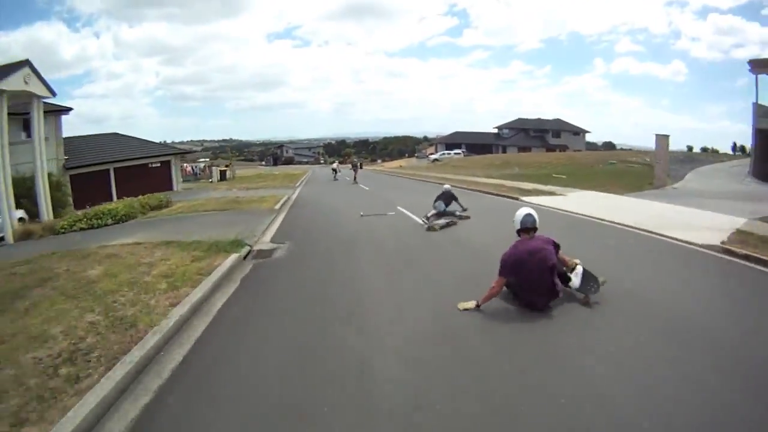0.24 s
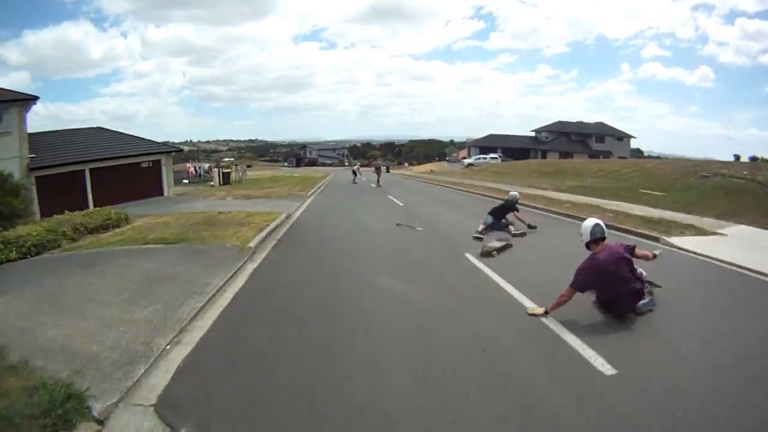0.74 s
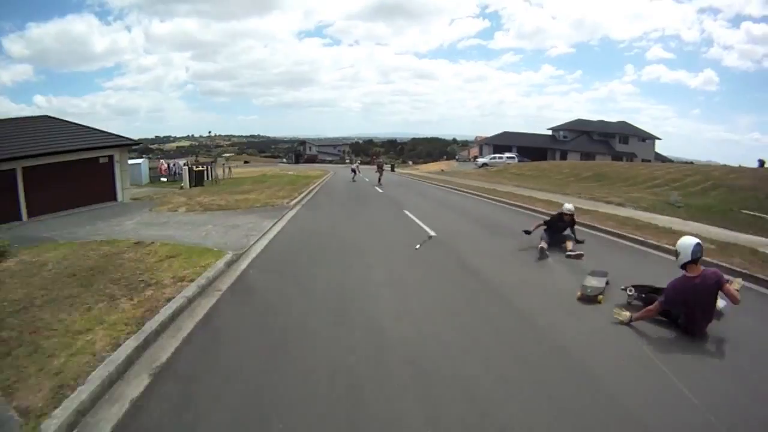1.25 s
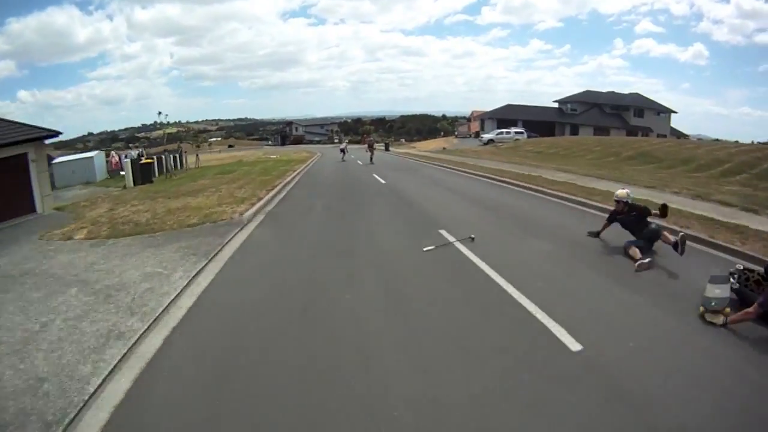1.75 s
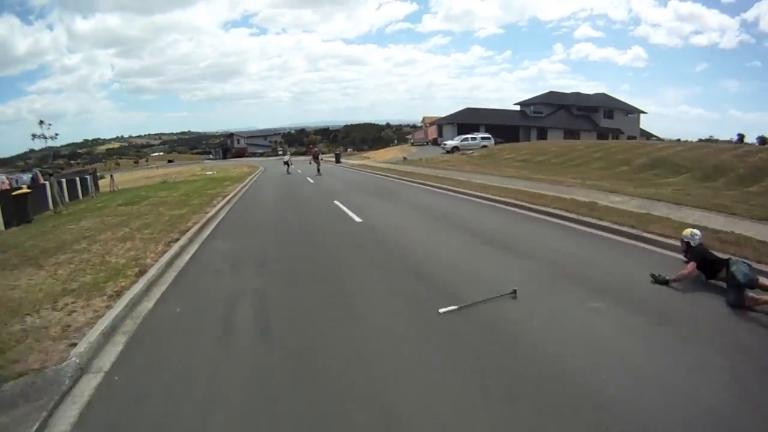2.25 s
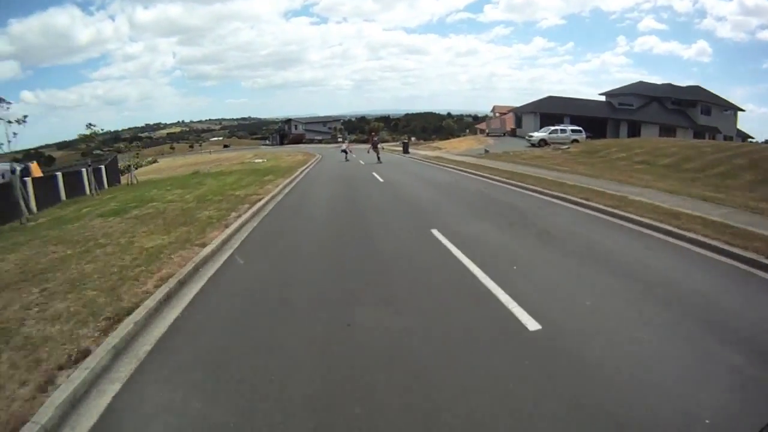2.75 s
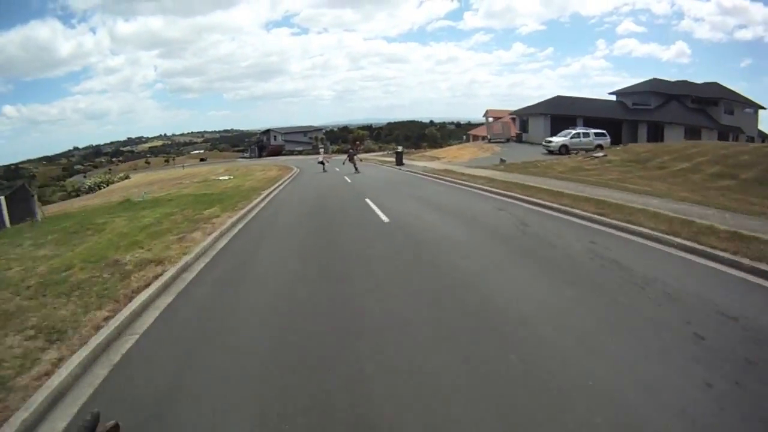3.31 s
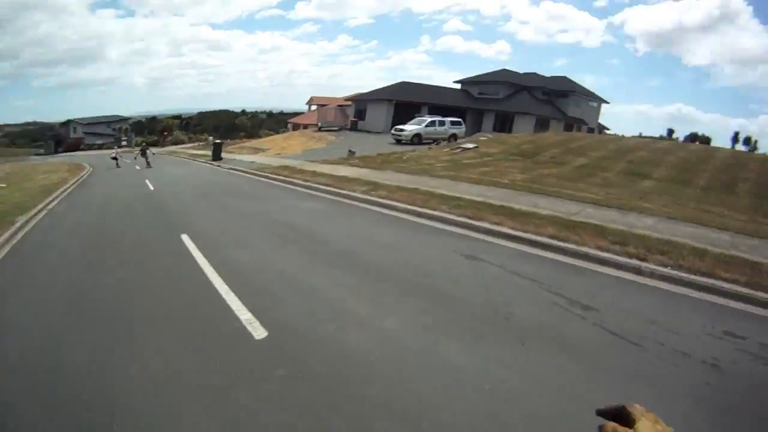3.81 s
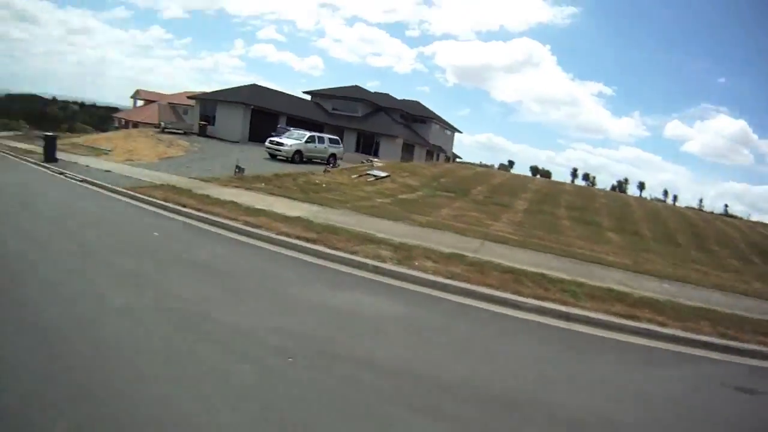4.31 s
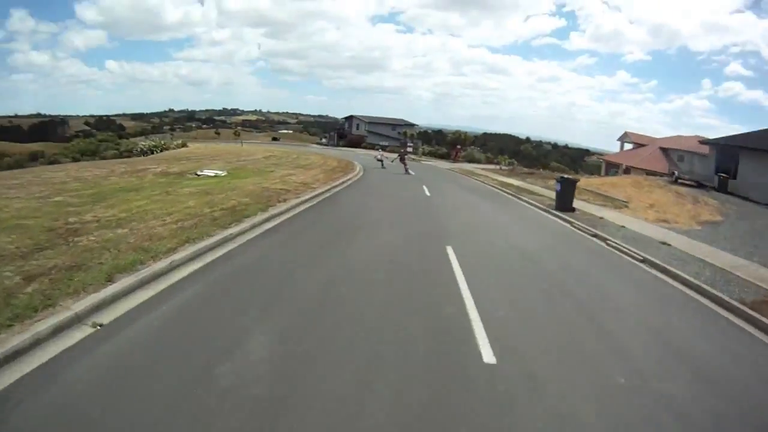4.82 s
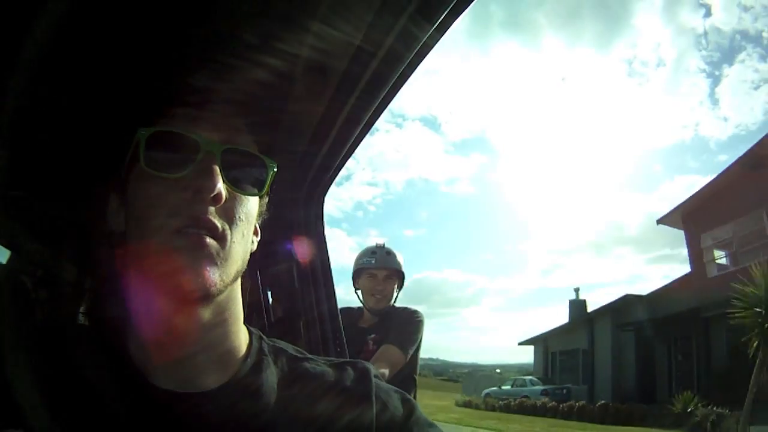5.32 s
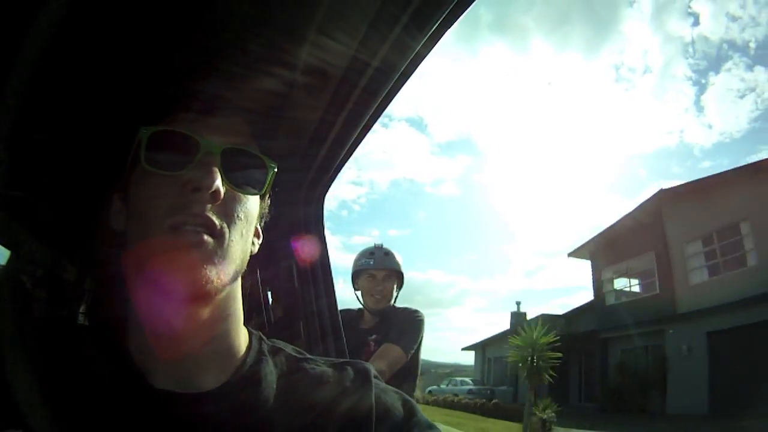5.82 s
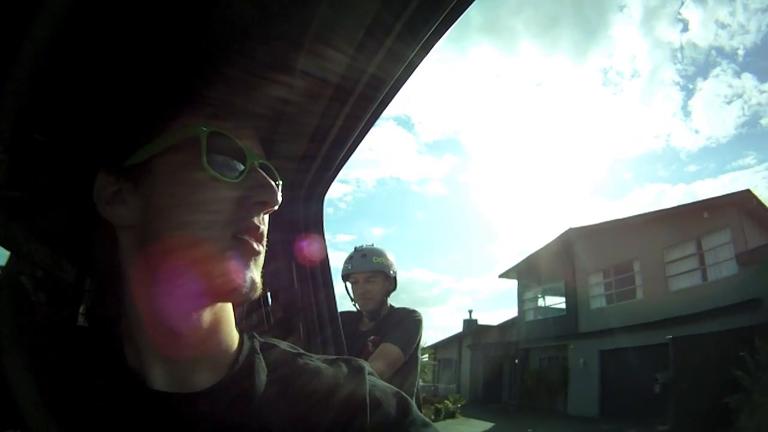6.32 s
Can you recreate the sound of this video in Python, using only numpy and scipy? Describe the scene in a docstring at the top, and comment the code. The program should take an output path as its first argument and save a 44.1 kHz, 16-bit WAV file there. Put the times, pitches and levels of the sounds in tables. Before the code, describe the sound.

Outdoors on an asphalt road, strong wind rumbles and thumps against a moving microphone. Underneath, board wheels roll and scrape in gritty, hollow-ringing slides, and a dropped pole knocks, loudest just after two seconds. At five seconds the sound dips to silence, then a car cabin appears: low steady engine hum, boomy road noise, soft hiss and a cluster of clicks.

```python
"""Longboards roll and slide down an asphalt road: gritty noise rings the decks, over a faint far road.
Wind buffets the microphone with noise and pushes of air; a dropped pole clatters as short ringing modes.
After a short fade through silence we sit in a car cabin with an open window: the engine hums as a stack of
tones, noise booms and hisses with it, and something clicks. Both places are heard at a low sample rate
with every sample repeated, which mirrors the sound around that rate."""
import sys
import numpy as np
from scipy import signal
from scipy.fft import rfft, irfft, next_fast_len
from scipy.io import wavfile
from scipy.ndimage import uniform_filter1d, map_coordinates

SR = 44100
rng = np.random.default_rng(int(sys.argv[2]) if len(sys.argv) > 2 else 0)


def pcm_store(signal):
    """Save signal as 16-bit PCM."""
    levels = np.round(np.clip(np.atleast_2d(signal), -1, 1) * 32767)
    wavfile.write(sys.argv[1], SR, levels.astype(np.int16).T)


N = 289296
T = np.arange(N) / SR  # time in seconds

# Wind at the microphone. Each row: time in seconds, buffet level in dB, flutter level in dB.
WIND_LEVELS = [(0.0, -18, -24), (0.36, -17, -24.5), (0.68, -15, -23), (0.72, -28, -34.5),
               (0.84, -26.5, -27.5), (0.89, -15, -22.5), (1.09, -22.5, -23), (1.33, -13, -20),
               (1.37, -20, -36), (1.44, -16, -28), (1.51, -23, -29.5), (1.62, -16.5, -22.5),
               (2.24, -15.5, -27), (2.41, -24, -24), (2.49, -16.5, -21.5), (2.63, -18.5, -27),
               (2.99, -16.5, -23.5), (3.83, -17.5, -25), (3.93, -30, -32.5), (3.99, -14.5, -24),
               (4.2, -17.5, -14.5), (4.63, -20, -27.5), (4.71, -14, -23), (4.87, -14.5, -24),
               (4.97, -25.5, -36)]
# Colours of the wind, low to high. Each row: frequency in Hz, relative density in dB per Hz.
BUFFET_SPECTRUM = [(7.1, -23), (12, -4.5), (48, 2.5), (160, -8), (210, -39), (350, -120)]
FLUTTER_SPECTRUM = [(59, -24), (100, -3), (137, -6), (177, -3), (268, -2), (384, -16.5), (480, -29),
                    (620, -47.5), (1060, -120)]
SPRAY_SPECTRUM = [(330, -35.5), (420, -3), (800, -8.5), (1100, -13), (1900, -18.5), (2300, -32)]
# Spray above the flutter: level at rest in dB, flutter level where it starts to grow in dB,
# growth in dB per dB of flutter, smoothing in seconds.
SPRAY_GROWTH = (-41.5, -22, 2.2, 0.1)
# The hardest pushes of air. Each row: time in seconds, relative peak in dB, width scale in ms.
HARD_PUSHES = [(0.171, -6, 3.1), (0.336, -4.5, 2.8), (0.472, -4.5, 4.5), (0.527, -7, 4.3),
               (0.655, -5.5, 3.5), (1.274, -11, 2.5), (1.312, -3.5, 2.7), (1.627, -6.5, 2.04),
               (1.668, -5, 6.4), (1.818, -5, 2.6), (2.492, -2, 6), (2.555, -7, 3.7), (2.653, -4.5, 2.9),
               (2.779, -4.5, 4.1), (3.145, -3.5, 3.5), (3.247, -10, 4.3), (3.417, -5, 2.5),
               (4.107, -5.5, 2.2), (4.213, -8, 1.3), (4.245, -12, 1.4), (4.348, -7, 1.6),
               (4.398, -7.5, 2.2), (4.718, -6, 2.7), (4.771, -5, 3.2)]

# Colours of the boards on the road. Each row: frequency in Hz, relative density in dB per Hz.
WHEEL_SPECTRUM = [(470, -24), (800, -8.5), (1200, 0), (1320, -1), (1560, -4.5), (1940, -14), (2050, -15),
                  (2660, -38.5), (4510, -120)]
GRIT_SPECTRUM = [(1150, -59), (1950, -7), (2110, -2), (2360, 4), (2780, -1.5), (2990, -11.5), (3890, -34.5),
                 (6580, -120)]
SQUEAL_SPECTRUM = [(1600, -33.5), (1700, -4.5), (1880, 1), (2000, -29.5)]  # a brighter band of hard slides
FAR_ROAD_SPECTRUM = [(1500, -25), (1900, -3.5), (2700, 4.0), (2990, -4.5)]
# Resonances of the sliding boards. Each row: frequency in Hz, width in Hz, gain in dB.
DECK_MODES = [(1040, 120, -0.5), (1195, 27, -11), (1510, 60, 7)]
# Slides. Each row: peak time, rise and fall in seconds, wheel and grit level in dB,
# centre of the deck ring in Hz.
BOARD_SLIDES = [(0.29, 0.037, 0.087, -36.5, -52, 1510), (0.44, 0.11, 0.2, -37, -51.5, 1190),
                (0.751, 0.054, .08, -42, -53, 1404), (0.96, 0.22, 0.48, -37.5, -50, 1258),
                (1.15, 0.12, 0.11, -31.5, -44, 1315), (1.275, 0.11, 0.063, -26, -39.5, 1450),
                (1.631, 0.29, 0.13, -34, -49.5, 1230), (1.839, 0.2, 0.16, -37, -54, 1174),
                (2.431, .2, 0.13, -31, -44.5, 1346), (2.57, 0.11, .13, -33.5, -54.5, 1226),
                (2.865, 0.019, 0.031, -37.5, -54.5, 1355), (3.149, 0.053, 0.046, -39, -57.5, 1410),
                (3.56, 0.055, 0.14, -42.5, -53.5, 1510), (3.9, 0.12, 0.16, -44, -54, 1260),
                (4.25, 0.32, 0.24, -38, -52, 1100), (4.5, 0.077, 0.18, -36.5, -45.5, 1470),
                (4.69, 0.16, 0.11, -37.5, -39.5, 1426), (4.96, 0.037, 0.079, -42, -49, 1450)]
# Plain rolling between slides, and how far the deck ring wanders there.
ROLL_DB, ROLL_GRIT_DB, ROLL_RING_HZ, RING_WANDER_HZ = -44.5, -57.5, 1260, 70
SLIDE_SHAPE = 1.53  # 1 pointed, higher flat-topped

# Blows of the pole, then clicks in the cabin. Each row: time in seconds, base level of the low modes in dB,
# base level of the high modes in dB, multiplier of the ring times.
POLE_BLOWS = [(0.266, -31, -49, 0.8), (0.735, -34, -39, 0.6), (1.24, -17, -40.5, 0.7),
              (1.261, -18, -39.5, 0.9), (2.255, -33, -69.5, 0.8), (2.309, -8.5, -24.5, 0.6),
              (2.312, -16.5, -29.5, 0.88), (2.319, -24.5, -39, 1), (2.477, -20, -23.5, 0.8),
              (3.533, -32.5, -54.5, 0.8), (4.642, -24, -51.5, 0.8), (4.688, -21.5, -45, 0.5)]
CABIN_CLICKS = [(5.0577, -17, -16.5, 0.3), (5.0705, -12, -28, 0.6), (5.086, -28, -38, 0.5),
                (5.1206, -22.5, -37.5, 0.6), (5.215, -12.5, -32.5, 1.01), (5.2324, -25, -38.5, 0.7),
                (5.2422, -14, -40.5, 0.5), (5.2467, -20, -48.5, .8), (5.2566, -26, -41.5, .7)]
# What rings in the pole and in the cabin trim. Each row: frequency in Hz before scatter, relative level in dB,
# time to fall 60 dB in seconds before the ring multiplier.
POLE_MODES = [(677, -2, 0.02), (870, -1.5, 0.035), (1196, 0, .045), (1536, 3.5, 0.03), (1820, -5.5, 0.022),
              (2370, -0.5, 0.046), (2740, 2.5, 0.025)]
TRIM_MODES = [(1147, -10, 0.038), (1310, -11, 0.047), (2090, -1, 0.025), (2430, -5.5, 0.023),
              (3660, 10.5, 0.019), (4260, 5.5, 0.019), (5240, -18, 0.014)]
SCATTER_DB = 2  # standard deviation of each mode's level from blow to blow

# The engine. Each row: time in seconds, firing rate in Hz, firing level in dB.
ENGINE_FIRING = [(5.12, 81.72, -25.5), (5.23, 83.25, -21), (5.43, 82.35, -22), (6.3, 82.84, -23),
                 (6.5, 83.4, -22.5), (6.56, 85, -28)]
# Order numbers of the hum, in multiples of the engine cycle rate.
HUM_ORDERS = [1, 5, 7, 8, 9, 10, 12, 14, 17, 18, 20, 22, 23, 26, 28, 32, 33, 36, 40, 42]
# Level of each of those orders, in dB relative to HUM_DB.
HUM_ORDER_LEVELS = [-18, -15, -17, -7, -8, -10, -8, -18, -21, -15, -16, -14, -20, -16, -18, -26, -30, -28,
                    -39, -33]
# Colours of the cabin noise. Each row: frequency in Hz, relative density in dB per Hz.
BOOM_SPECTRUM = [(8.8, -45), (15, -19), (32, -12), (60, -2), (85, -23), (130, -9.5), (180, -15),
                 (252, -17.5), (319, -20), (378, -14.5), (576, -16.5), (850, -36), (1100, -65),
                 (1870, -120)]
HISS_SPECTRUM = [(460, -32.5), (780, -19), (886, -9.5), (1050, -11.5), (1290, -6), (1510, -8.5),
                 (1690, -4.5), (2540, -10.5), (3010, -8), (3510, -16), (4200, -24.5), (5150, -21),
                 (5950, -33), (7740, -80), (13100, -120)]
SWISH_SPECTRUM = [(2400, -26), (2800, -12.5), (3300, -5), (3600, -30), (5200, -29.5), (5800, -35.5)]
# A brief hiss at the end. Each row: time in seconds, level in dB.
SWISH_LEVELS = [(6.47, -62), (6.5, -43), (6.52, -35), (6.56, -32)]
HUM_DB, BOOM_DB, HISS_DB = -23, -26, -38

# Fade out of the road, fade in of the cabin: start in seconds, end in seconds, power of the curve.
ROAD_FADE_OUT = (4.955, 5.034, 1.25)
CABIN_FADE_IN = (5.042, 5.12, 1.1)
CUT_S = 5.038
EDIT_HZ, EDGE_HZ = 48000, 160  # rate after repeating samples, width of the top cutoff
ROAD_RATE_HZ, ROAD_TOP_HZ = 6000, 7780
CABIN_RATE_HZ, CABIN_TOP_HZ = 12000, 15380


def amp(db):
    """dB to gain."""
    return 10 ** (np.asarray(db) / 20)


def unit(x):
    """Scaled to rms 1."""
    return x / np.sqrt(np.mean(x ** 2) + 1e-20)


def curves(rows):
    """One value per sample for each column after the time."""
    s, *cols = np.transpose(rows)
    return [np.interp(T, s, c) for c in cols]


def wobble(rate):
    """A smooth random curve, rate knots a second."""
    knots = rng.standard_normal(int(N * rate / SR) + 4)
    return map_coordinates(knots, [T * rate])


def filtered(x, response):
    """x times a response of frequency."""
    m = next_fast_len(N + SR // 2)
    return irfft(rfft(x, m) * response(np.fft.rfftfreq(m, 1 / SR)), m)[:N]


def rush(spectrum, lumps_db):
    """Noise whose level moves by lumps_db, then coloured, rms 1."""
    f, db = np.transpose(spectrum)

    def colour(hz):
        return amp(np.interp(np.log(hz + 1), np.log(f + 1), db, -120, -120))

    return unit(filtered(amp(lumps_db) * rng.standard_normal(N), colour))


def pushes(s, db, width_ms):
    """Short bell-shaped pushes or pulls of air, each with an undershoot on both sides."""
    reach = np.arange(-SR // 60, SR // 60)
    u = reach / SR / (width_ms[:, None] / 1000)
    shape = np.exp(-(u / 0.57) ** 2) - 0.22 * np.exp(-(u / 2.4) ** 2)
    push_or_pull = np.where(rng.random(len(s)) < 0.6, 1.5, -1.5)
    height = push_or_pull * amp(db)
    at = np.clip(np.round(s * SR).astype(int)[:, None] + reach, 0, N - 1)
    return np.bincount(at.ravel(), (height[:, None] * shape).ravel(), N)


def wind():
    """Eddies shake the microphone: low buffet, faster flutter, sharp pushes, and spray thrown above them."""
    buffet_db, flutter_db = curves(WIND_LEVELS)
    rest_db, knee_db, growth, smooth_s = SPRAY_GROWTH
    smooth_flutter_db = uniform_filter1d(flutter_db, round(smooth_s * SR))
    spray_db = rest_db + growth * np.clip(smooth_flutter_db - knee_db, 0, None)

    eddies = wobble(35)  # shared by all three bands
    buffet = amp(buffet_db) * rush(BUFFET_SPECTRUM, 1.5 * eddies)
    flutter = amp(flutter_db) * rush(FLUTTER_SPECTRUM, 2.5 * eddies + 1.97 * wobble(70))
    spray = amp(spray_db + wobble(4)) * rush(SPRAY_SPECTRUM, 2.1 * eddies + 2.5 * wobble(110))

    # many small pushes at random times, mostly weak
    when, size, width = rng.random((450, 3)).T
    small_db = -5.5 * np.log(1 - 0.96 * size)
    small = unit(pushes(when * N / SR, small_db, 1.66 + 1.87 * width))
    hard = pushes(*np.transpose(HARD_PUSHES))
    return buffet + flutter + spray + amp(flutter_db - 3.5) * small + hard


def slides():
    """Wheel level, grit level and ring centre: each slide pulls them away from plain rolling and lets go."""
    peak, rise, fall, wheels_db, grit_db, ring_hz = np.transpose(BOARD_SLIDES)[:, :, None]
    away = np.where(T < peak, (peak - T) / rise, (T - peak) / fall)
    grip = np.clip(1 - away ** SLIDE_SHAPE, 0, 1)
    wander_hz = RING_WANDER_HZ * (1 - grip.max(0)) * wobble(13)
    centre_hz = ROLL_RING_HZ + (grip * (ring_hz - ROLL_RING_HZ)).sum(0) + wander_hz
    wheel_level = ROLL_DB + (grip * (wheels_db - ROLL_DB)).max(0) + 1.02 * wobble(9)
    grit_level = ROLL_GRIT_DB + (grip * (grit_db - ROLL_GRIT_DB)).max(0)
    return wheel_level, grit_level, centre_hz


def deck_ring(rolling, ring_hz):
    """Wheel noise through the deck resonances; the mode nearest the centre rings most."""
    ring = np.zeros(N)
    for c, w, db in DECK_MODES:
        nearness = np.exp(-((ring_hz - c) / 170) ** 2)
        ring += nearness * filtered(rolling, lambda f: amp(db) * 1j * f * w / (c * c - f * f + 1j * f * w))
    return ring


def boards():
    """Wheels on rough asphalt: gritty noise, ringing the decks more the harder they slide."""
    wheels_db, grit_db, ring_hz = slides()
    bumps = wobble(30)
    rolling = rush(WHEEL_SPECTRUM, 1.6 * bumps + 0.72 * wobble(140))
    hardness = np.clip((wheels_db + 50.5) / 8, 0, 1.5)
    wheels = unit(0.95 * rolling + hardness * deck_ring(rolling, ring_hz))

    grit = rush(GRIT_SPECTRUM, 1.5 * bumps + 2.2 * wobble(200))
    squeal_db = np.clip((ring_hz - 1460) / 25, -20, 0)  # full when the deck rings high
    grit += amp(squeal_db) * rush(SQUEAL_SPECTRUM, bumps)

    far_road = amp(-64) * rush(FAR_ROAD_SPECTRUM, 0)
    return amp(wheels_db) * wheels + amp(grit_db) * grit + far_road


def struck(events, modes, split_hz):
    """Each blow cracks and rings modes at scattered strengths; low and high parts follow their own levels."""
    out, t = np.zeros(N + SR), np.arange(SR // 10) / SR
    dull = signal.butter(2, split_hz, fs=SR, output="sos")
    hz, db, t60 = np.transpose(modes)[:, :, None]
    all_luck = rng.standard_normal((len(events), len(modes), 2))
    for (s, low_db, high_db, length), luck in zip(events, all_luck):
        blow_db = np.where(hz < split_hz, low_db, high_db)
        level_db = db + blow_db + SCATTER_DB * luck[:, :1] - 60 * t / (t60 * length)
        detuned_hz = hz * (1 + 0.023 * luck[:, 1:])
        ring = amp(level_db - 0.5) * np.sin(2 * np.pi * detuned_hz * t)

        sharp, blunt = rng.standard_normal((2, len(t)))
        crack = amp(high_db + 6) * sharp + amp(low_db - 8) * signal.sosfilt(dull, blunt)
        crack *= amp(-60 * t / (0.024 * length))
        onset = 1 - np.exp(-t / 0.00048)
        out[round(s * SR):][:len(t)] += (ring.sum(0) + crack) * onset
    return out[:N]


def pole():
    """The dropped pole clatters: each blow rings its short modes."""
    return struck(POLE_BLOWS, POLE_MODES, 2100)


def engine(cycle, firing_db):
    """A clean firing tone, four a cycle, with other orders of the cycle wavering in level and phase."""
    firing = amp(firing_db + 0.6 * wobble(6)) * np.sin(4 * cycle)
    hum = np.zeros(N)
    for order, db in zip(HUM_ORDERS, HUM_ORDER_LEVELS):
        level = amp(db + HUM_DB + 2.6 * wobble(7))
        hum += level * np.sin(order * cycle + 0.66 * wobble(6) + rng.normal(0, 0.92))
    return np.sqrt(2) * (firing + hum)  # levels are rms


def cabin():
    """Inside the car: engine tones, boom and road hiss pulsing twice a cycle, clicks and a late swish."""
    firing_hz, firing_db = curves(ENGINE_FIRING)
    cycle = 2 * np.pi * np.cumsum(firing_hz / 4) / SR  # phase in radians
    tones = engine(cycle, firing_db)
    pulse = np.sin(2 * cycle)
    boom = amp(BOOM_DB) * rush(BOOM_SPECTRUM, 0.74 * pulse + 1.2 * wobble(20))
    hiss = amp(HISS_DB) * rush(HISS_SPECTRUM, 0.51 * pulse + 0.67 * wobble(30))
    swish = amp(curves(SWISH_LEVELS)[0]) * rush(SWISH_SPECTRUM, 1.3 * wobble(98))
    clicks = struck(CABIN_CLICKS, TRIM_MODES, 2800)
    return tones + boom + hiss + swish + clicks


def scene():
    """The road fades out, the cabin fades in."""
    out_start, out_end, out_power = ROAD_FADE_OUT
    in_start, in_end, in_power = CABIN_FADE_IN
    leaving = np.clip((T - out_start) / (out_end - out_start), 0, 1)
    arriving = np.clip((T - in_start) / (in_end - in_start), 0, 1)
    road = (wind() + boards() + pole()) * (1 - leaving) ** out_power
    return (road + cabin() * arriving ** in_power)[None]


def held(x, rate_hz, top_hz):
    """Sampled at rate_hz, every sample repeated: steps that mirror the spectrum around rate_hz."""
    coarse = signal.resample(x, N * rate_hz // SR)
    steps = np.repeat(coarse, EDIT_HZ // rate_hz)

    def cutoff(hz):
        return np.cos(np.pi / 2 * np.clip((hz - top_hz) / EDGE_HZ + 1, 0, 1)) ** 2

    return filtered(signal.resample(steps, N), cutoff)


def record(dry):
    """The microphone rounds off hard peaks; each scene has its own low sample rate and band limit."""
    soft = dry[0] / (1 + np.abs(dry[0] / 0.95) ** 4) ** (1 / 4)
    road = held(soft * (T < CUT_S), ROAD_RATE_HZ, ROAD_TOP_HZ)
    car = held(soft * (T >= CUT_S), CABIN_RATE_HZ, CABIN_TOP_HZ)
    return (road + car)[None]


dry = scene()
out = record(dry)
pcm_store(out)
```